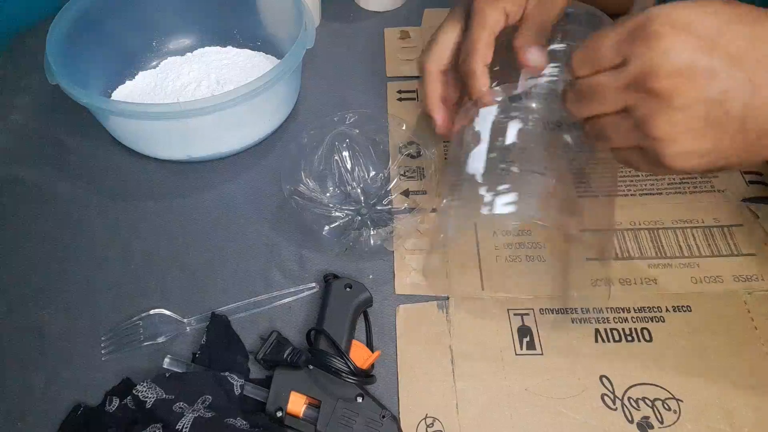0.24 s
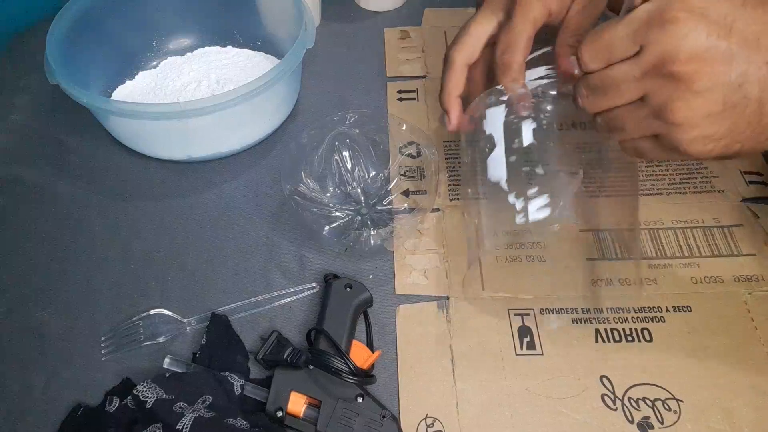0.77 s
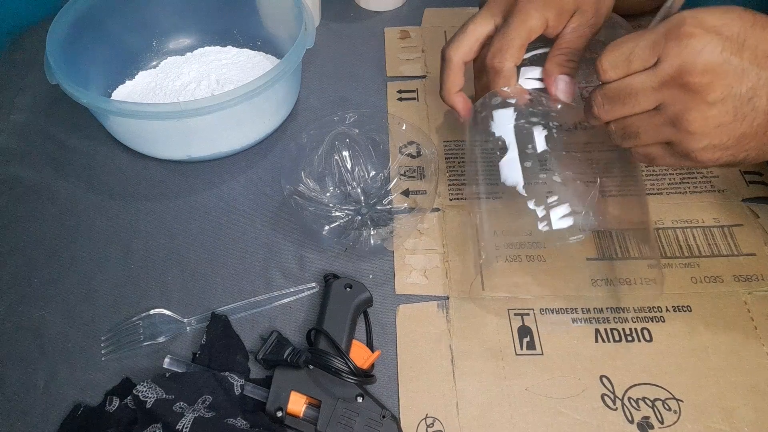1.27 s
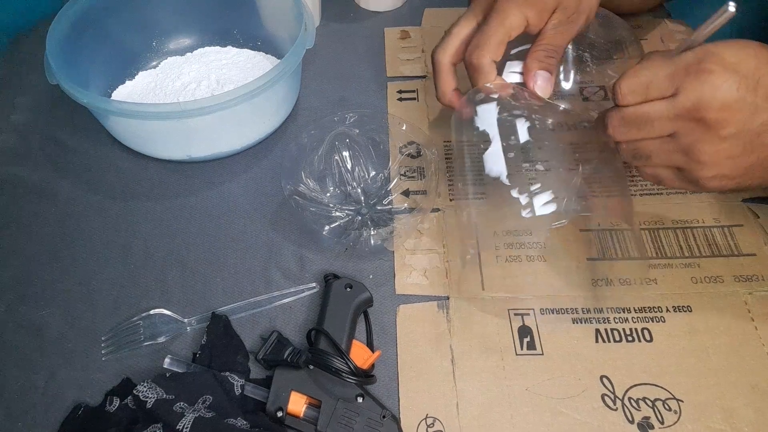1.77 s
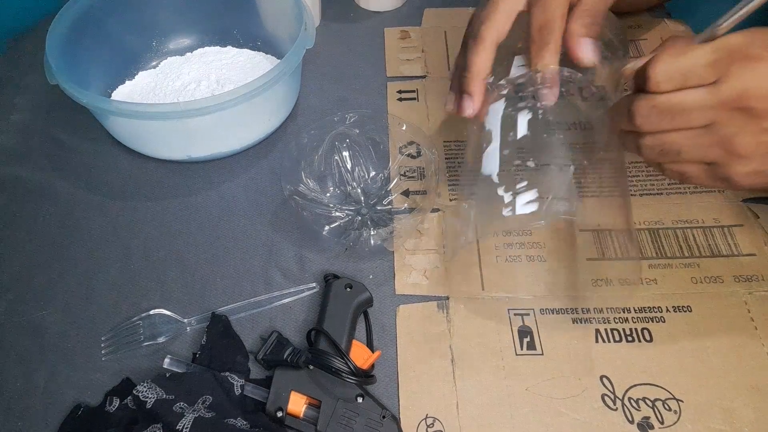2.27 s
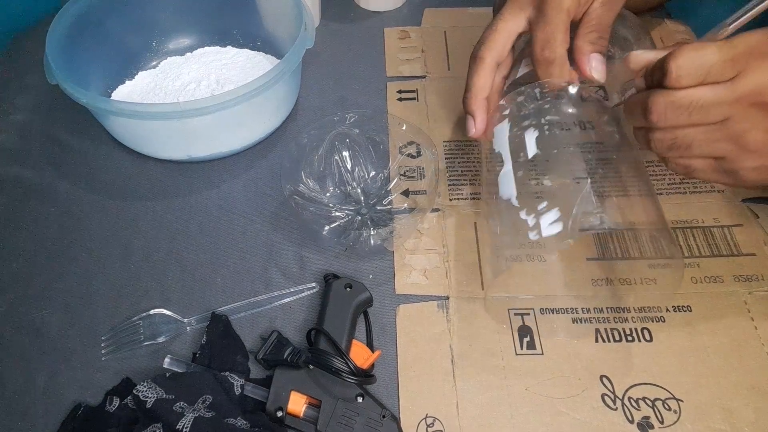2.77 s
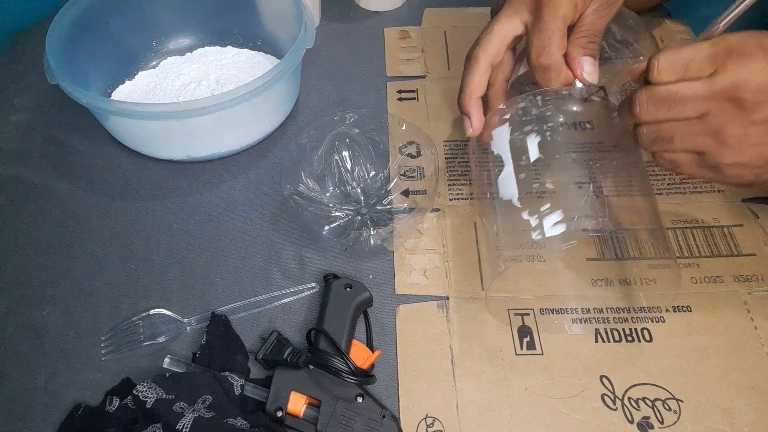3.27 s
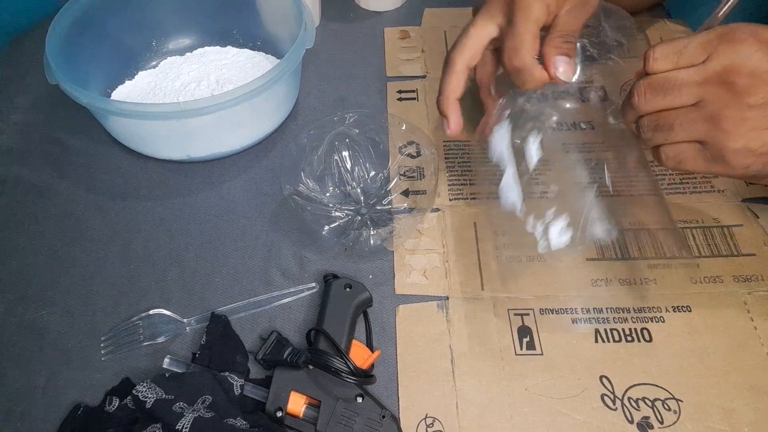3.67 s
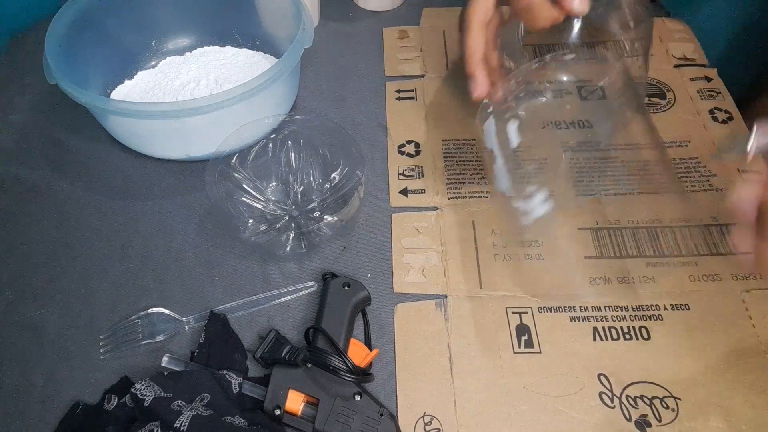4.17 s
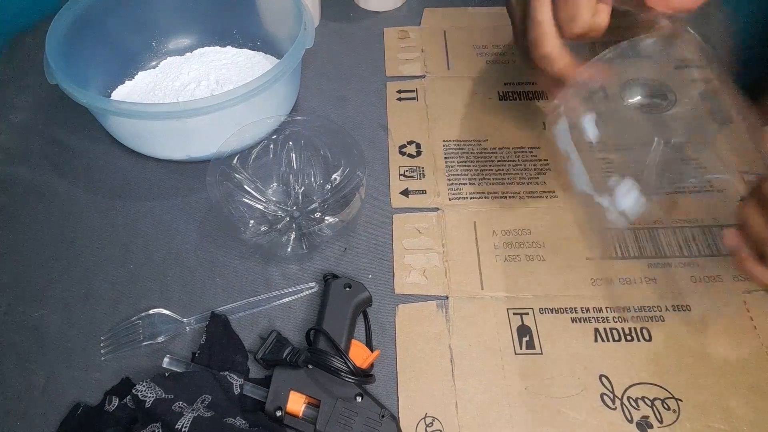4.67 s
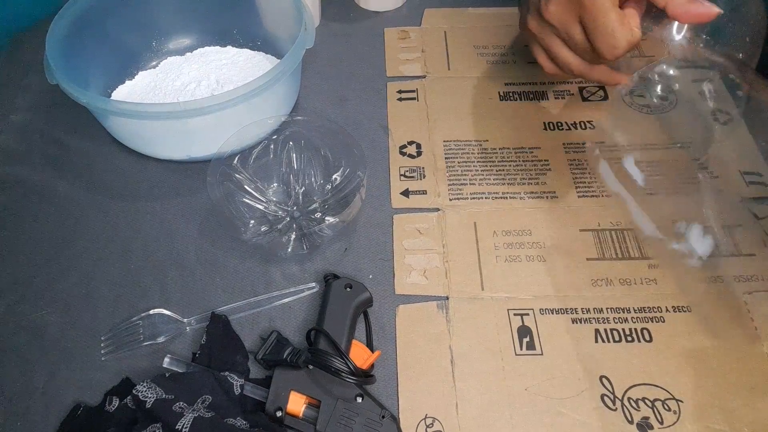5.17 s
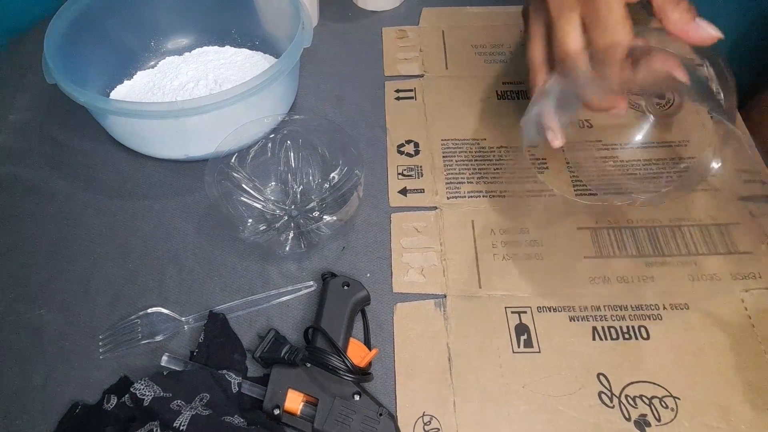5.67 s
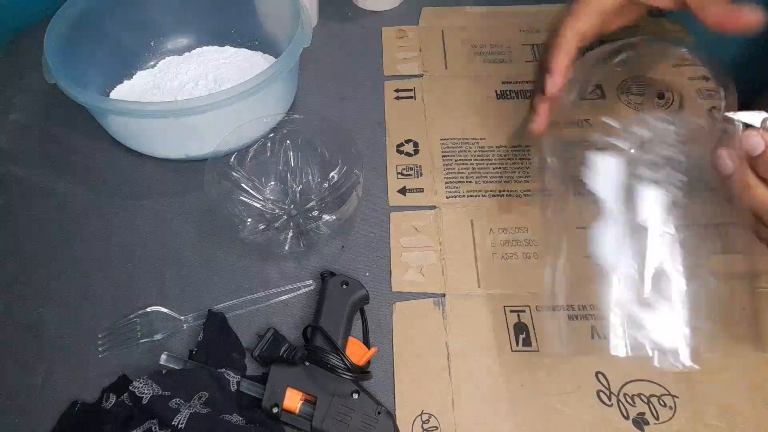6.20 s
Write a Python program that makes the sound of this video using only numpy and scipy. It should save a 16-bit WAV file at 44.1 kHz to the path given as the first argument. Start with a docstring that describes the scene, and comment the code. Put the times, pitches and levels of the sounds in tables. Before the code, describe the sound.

A thin plastic bottle is squeezed and trimmed close to the microphone in a small room with faint steady air noise. Light crinkles and scrapes open, followed by a cluster of sharp, hollow pops and thuds from 0.4 to 0.7 seconds. A loud crack and clack comes at 0.9, a strong hollow pop at 1.6 and smaller snaps around 2. Quieter blade and finger scrapes follow with small clicks. From about 3.3 seconds the blade saws quickly to and fro, each stroke firmer, ending in a loud burst of cracks at 3.8. Crackling, rubbing and soft bumps continue as the bottle turns on cardboard with a faint low table rumble, with sharper snaps near 4.7. Another loud group of cracks and hollow thuds falls between 5.4 and 5.7 seconds. Lighter scrapes and clicks run until about 6.4. Each snap has a short room echo.

```python
"""Trimming a plastic bottle

Close to the microphone in a small room, hands squeeze and turn a thin bottle on cardboard as a blade
trims it. Blade and fingers scrape in short strokes, and the table rumbles. The wall buckles in snaps,
each a short crack and a hollow ring of the dented panel. The bottle thuds and clacks as it buckles
or bumps the cardboard, and the room answers."""
import sys
import numpy as np
from scipy import signal
from scipy.fft import rfft, irfft, next_fast_len
from scipy.io import wavfile

SR = 44100
rng = np.random.default_rng(int(sys.argv[2]) if len(sys.argv) > 2 else 0)


def dump_mix(stems):
    """Bounce the given channels to the path in sys.argv[1] as a 16-bit WAV at rate SR."""
    frames = np.atleast_2d(stems).T  # one column per channel
    limited = np.clip(frames, -1, 1)  # hard clip at full scale
    pcm = np.round(limited * 32767).astype(np.int16)
    wavfile.write(sys.argv[1], SR, pcm)


N = 284004


def amp(db):
    return 10 ** (np.asarray(db) / 20)


def unit_rms(x):
    return x / np.sqrt(np.mean(x ** 2) + 1e-20)


def filtered(x, response):
    """x times a response of frequency."""
    size = next_fast_len(N + SR // 4)
    return irfft(rfft(x, size) * response(np.fft.rfftfreq(size, 1 / SR)), size)[..., :N]


def coloured(x, spectrum):
    """x given a (Hz, dB) spectrum, at rms 1."""
    knots_hz, db = np.transpose(spectrum)
    return unit_rms(filtered(x, lambda hz: amp(np.interp(np.log(hz + 1), np.log(knots_hz), db))))


def minimum_phase(db):
    """A response with these gains that lets nothing sound before the blow."""
    cepstrum = irfft(np.log(np.maximum(amp(db), 1e-6)))
    half = len(cepstrum) // 2
    return np.exp(rfft(np.r_[cepstrum[0], 2 * cepstrum[1:half], np.zeros(half)]))


def stereo_noise(size, width):
    """A shared part and an opposed part."""
    mid, side = rng.standard_normal((2, size))
    return np.array([mid + width * side, mid - width * side])


def add(out, start_s, x):
    """Mix x into out."""
    i = max(round(start_s * SR), 0)
    out[:, i:i + x.shape[1]] += x[:, :max(out.shape[1] - i, 0)]


# the air of the room: (frequency [Hz], level [dB])
AIR_SPECTRUM = [(25, -30), (40, -18.5), (62, -7), (80, -23.5), (200, -12), (300, -1.5), (550, -6.5),
                (900, -7.5), (2300, -13.5), (4000, -23), (7200, -28.5), (8200, -37.5), (16000, -31.5)]
def room_tone(air_db, hum_db, hum_hz):
    """Quiet steady air and a low hum around the microphone."""
    hum = amp(hum_db) * np.sin(2 * np.pi * hum_hz * np.arange(N) / SR)
    return amp(air_db) * coloured(stereo_noise(N, width=0.81), AIR_SPECTRUM) + hum


# the bottle slides and turns on the cardboard: (time [s], level [dB])
SLIDING = [(0, -58), (.3, -68.5), (3.6, -74.5), (4.0, -56), (4.35, -73), (4.8, -52), (5.05, -68),
           (5.68, -52), (5.87, -59), (5.98, -52.5), (6.44, -55.5)]
# the table's rumble: (frequency [Hz], level [dB])
RUMBLE_SPECTRUM = [(25, -31), (45, -12.5), (62, -1.5), (76, -1), (96, -2), (125, -1), (165, -4.5),
                   (200, -13.5), (400, -44.5)]
def table_rumble(stroke_push, level_db, rub_db=-25.5, thump_db=-48, thump_fade_s=0.072):
    """The sliding bottle rumbles through the cardboard; strokes and clear buckles each add a push."""
    t = np.arange(N) / SR
    push = amp(np.interp(t, *np.transpose(SLIDING))) + amp(rub_db) * stroke_push
    for start, _, ring_db, *_ in BUCKLES:
        push += amp(ring_db + thump_db) * (t > start) * np.exp(-np.abs(t - start) / thump_fade_s)
    rumble = coloured(stereo_noise(N, width=0.34), RUMBLE_SPECTRUM)
    return amp(level_db) * push * rumble * amp([[-.8], [.8]])


# strokes, edge high for the blade and low for a fingertip: (peak [s], length [s], level [dB], edge [dB])
STROKES = [(0.013, 0.11, -46, -3), (0.113, 0.057, -43.5, -2), (.2, 0.27, -52.5, -1), (.35, .085, -40, 5),
           (0.459, 0.14, -34, -11.5), (0.658, 0.073, -35.5, -2.5), (0.786, .09, -45, -2),
           (1.16, 0.098, -54, 3), (1.283, .11, -54, 5), (1.405, .07, -54, 4), (1.544, 0.13, -44.5, 10.5),
           (1.626, 0.055, -41.5, 3.5), (1.79, 0.15, -53, -12), (2.02, .08, -48, -14),
           (2.125, 0.21, -46.5, 7), (2.214, .1, -39, -2), (2.28, 0.16, -45.5, -4), (2.384, .08, -45, -4.5),
           (2.46, 0.07, -49, -4.5), (2.6, 0.075, -53, -6.5), (2.675, 0.078, -46.5, -0.5),
           (2.829, 0.2, -54, -8), (3.071, .09, -39.5, 2.5), (3.162, 0.047, -41, 10),
           (3.195, .1, -42.5, 3.5), (3.77, 0.11, -40, 3), (3.84, .1, -32, 0), (3.962, 0.19, -34, -0.5),
           (4.15, 0.17, -46, -4.5), (4.393, .07, -52, -19.5), (4.579, 0.14, -44.5, 4),
           (4.731, 0.082, -37.5, -2.5), (4.852, 0.036, -35, -2.5), (5.16, 0.054, -47, 2),
           (5.38, 0.17, -41, 5.5), (5.458, 0.092, -37, -13.5), (5.645, 0.098, -42.5, -9),
           (5.784, 0.1, -44.5, -1.5), (5.968, 0.16, -41.5, 4), (6.096, 0.078, -37.5, 3.5),
           (6.205, 0.27, -53, 2.5), (6.365, 0.15, -41, 0)]
def stroke_force(rise_share=0.42, hollow_per_edge=0.55):
    """Drive of hollow, scrape and fizz: each stroke swells and fades; more edge trades hollow for fizz."""
    t, force = np.arange(N) / SR, np.zeros((3, N))
    for peak, length, db, edge in STROKES + sawing(count=6):
        swell = np.interp((t - peak) / length, [-rise_share, 0, 1 - rise_share], [0, 1, 0])
        force += amp([db - hollow_per_edge * edge, db, db + edge])[:, None] * swell
    return force


def slips(per_second, spread_db, fade_s=0.00088):
    """Grain of the tiny slips under a stroke: irregular, a few large among many small."""
    when, rarity = rng.random((int(per_second * N / SR), 2)).T
    sizes = amp(-spread_db * np.log(np.maximum(rarity, .01)))
    impulses = np.bincount((when * N).astype(int), sizes ** 2, N)
    energy = signal.lfilter([1], [1, -np.exp(-1 / (fade_s * SR))], impulses)
    return unit_rms(np.sqrt(energy))


# the rubbed bottle's hollow, stick-slip, finest slips, blade's thin ring: (frequency [Hz], level [dB])
HOLLOW_SPECTRUM = [(120, -27.5), (250, -9.5), (330, -1.5), (420, -1.5), (510, 4.5), (620, -1), (760, -10),
                   (1200, -42)]
SCRAPE_SPECTRUM = [(400, -30.5), (800, 6.5), (1400, 1), (2500, -2.5), (4200, -4), (5800, -8.5),
                   (7400, -14.5), (8200, -32.5), (16000, -65)]
FIZZ_SPECTRUM = [(4000, -42.5), (7500, -0.5), (11000, 0), (14000, 1), (16000, -11.5)]
BLADE_SPECTRUM = [(4300, -39), (5200, 0), (5700, -2), (6100, -4.5), (6900, -18)]
# how deep the blade bites: (time [s], depth [0-1])
BLADE_BITE = [(3.0, 0.05), (3.15, 0), (3.35, 0.9), (3.75, 1), (3.85, 0.31)]
def scraping(force, hollow_db, scrape_db, fizz_db, blade_db, room_db):
    """Close up, slips rasp on the film, stir the hollow of the bottle and make the blade ring."""
    hollow_force, scrape_force, fizz_force = force
    grain = slips(per_second=1500, spread_db=3)
    bite = np.interp(np.arange(N) / SR, *np.transpose(BLADE_BITE))

    def friction(spectrum, width):
        return coloured(grain * stereo_noise(N, width), spectrum)

    hollow = amp(hollow_db) * hollow_force * friction(HOLLOW_SPECTRUM, width=0.35)
    scrape = amp(scrape_db) * scrape_force * friction(SCRAPE_SPECTRUM, width=0.91)
    fizz = amp(fizz_db) * fizz_force * friction(FIZZ_SPECTRUM, width=1.0)
    blade = amp(blade_db) * scrape_force * bite * friction(BLADE_SPECTRUM, width=0.45)
    direct = hollow + (film(scrape + fizz) + blade) * amp([[-1.2], [1]])
    return direct + amp(room_db) * room_tail(direct, t60=0.19, width=0.44)[:, :N]


# resonances of the stiff film: (frequency [Hz], width [Hz], gain [dB])
FILM_RESONANCES = [(1680, 69, 2), (1880, 120, 4), (2400, 110, -2.5), (2624, 410, 3.5), (2860, 200, 0),
                   (3500, 380, -0.5), (5600, 1700, 2)]
def film(x):
    """The bottle's thin wall colours its cracks and scrapes."""
    for hz, width_hz, db in FILM_RESONANCES:
        x = x + (amp(db) - 1) * signal.lfilter(*signal.iirpeak(hz, hz / width_hz, SR), x)
    return x


def room_tail(x, t60, width):
    """The small room's diffuse answer to x, different at each call."""
    t = np.arange(int(.4 * SR)) / SR
    onset = 1 - np.exp(-(t / 0.00048) ** 2)
    response = stereo_noise(len(t), width) * amp(-60 * t / t60) * onset
    response /= np.linalg.norm(response, axis=1, keepdims=True)
    return signal.fftconvolve(x, response, axes=1)


def crinkles(pitch_hz=508, spread_octaves=0.15, scatter=0.1, sharpness_db=-11.5):
    """Each of the STROKES sets off one small buckle near its peak; rows as in BUCKLES."""
    rows = []
    for peak, length, db, _ in STROKES:
        when, detune, swing, jump = rng.standard_normal(4)
        start = peak + scatter * length * when
        hz = pitch_hz * 2 ** (spread_octaves * detune)
        rows.append((start, hz, db - 2.5 - swing, db - 3.5 - jump, sharpness_db))
    return rows


def ring(t, modes, rise_s):
    """Plastic swings to a new shape and is quickly damped by the hand; a thin wall radiates little bass."""
    swing = sum(amp(db + rng.normal(0, 1) - 60 * t / t60) * np.sin(2 * np.pi * hz * t)
                for hz, db, t60 in modes)
    radiation = signal.butter(3, [256, 6000], "band", fs=SR, output="sos")
    sound = signal.sosfilt(radiation, swing * (1 - np.exp(-t / rise_s)))
    return sound / np.abs(sound).max()


# a crack with equal clack, crack and tick: (frequency [Hz], level [dB])
CRACK_SPECTRUM = [(200, -41.5), (480, -5.5), (720, 7.5), (1080, -0.5), (1750, -1), (3000, -0.5), (4500, 1),
                  (5800, 3), (7400, 1), (8300, -6.5), (12000, -3), (15500, -9.5)]
def crack(t, levels_db, fade_s, bands_hz):
    """A crease jumps through the film: a sharp burst shaped in three bands, clack, crack and tick."""
    hz = np.fft.rfftfreq(len(t), 1 / SR) + 1
    knots_hz, db = np.transpose(CRACK_SPECTRUM)
    colour = np.interp(np.log(hz), np.log(knots_hz), db)
    colour += np.interp(np.log(hz), np.log(bands_hz), levels_db)
    burst = rng.standard_normal((2, len(t))) * np.exp(-t / fade_s)
    burst /= np.linalg.norm(burst, axis=1, keepdims=True)
    mid, side = rfft(burst) * minimum_phase(colour)
    side *= np.interp(hz, [600, 4000], [.42, .72])  # short waves differ more from left to right
    return irfft([mid + side, mid - side], len(t)) * (t < t[-1] / 2)


# clear buckles of the wall: (time [s], pitch [Hz], ring [dB], crack [dB], tick over crack [dB])
BUCKLES = [(.0723, 494, -41, -40.5, -8.5), (0.0984, 530, -41, -34, -30), (0.1719, 525, -40, -36.5, -14),
           (.332, 360, -57, -48, -3), (.352, 530, -27, -40, -8.5), (0.4204, 395.5, -13.5, -31.5, -18),
           (0.5061, 394, -17.5, -32.5, -11.5), (.519, 460, -19.5, -29, -5.5), (.526, 471, -14, -32.5, -2),
           (.533, 495, -9.5, -30, -23.5), (0.6281, 490, -16.5, -31.5, -18), (.656, 451, -26, -45.5, -19),
           (0.8739, 521, -11, -10.5, -41), (1.572, 495, -3.5, -32.5, -31.5),
           (1.6153, 530, -35, -35.5, -17.5), (1.7536, 490, -35, -50, -13.5), (1.7919, 487, -23, -40.5, -7),
           (2.0196, 437, -29, -49.5, -6), (2.0645, 432, -15.5, -56, -1), (2.19, 489, -28.5, -42, -10),
           (2.217, 516, -30.5, -38.5, -31.5), (2.513, 540, -40.5, -41, -19.5), (3.0659, 432, -38, -56, 1.5),
           (3.6733, 505, -29, -40.5, -23.5), (3.781, 524, -15.5, -30, -8.5), (3.7888, 534, -28, -20, -5.5),
           (3.7909, 491, -3, -21, -7), (3.819, 516, -32, -37, -18.5), (3.8762, 485, -38.5, -32.5, -11),
           (3.9237, 470, -45.5, -36.5, -5), (3.952, 448, -42.5, -42, -12), (3.97, 699, -29, -34.5, -8),
           (3.9961, 492, -25, -34, -7.5), (4.0241, 424, -26.5, -50, -13.5),
           (4.1164, 373, -37.5, -37.5, -16.5), (4.165, 614, -36.5, -47, -2.5),
           (4.197, 394, -27.5, -45.5, -30.5), (4.546, 407, -31.5, -42, -13),
           (4.6828, 434, -32.5, -25.5, -15), (4.766, 420, -29, -21.5, -11), (4.852, 520, -34.5, -39, -18),
           (5.1536, 420, -55, -36.5, -9.5), (5.3753, 321, -29.5, -27, -15.5),
           (5.433, 563, -24.5, -37.5, -9), (5.4406, 540, -27, -21, -20), (5.449, 560, -35, -31, -7.5),
           (5.467, 531, -14.5, -36, -11.5), (5.5446, 282, -54, -41, -12.5),
           (5.6773, 511, -17.5, -27, -32.5), (5.69, 527, -15, -34.5, -14), (5.9435, 658, -31, -35, -13.5),
           (6.0712, 645, -36.5, -41, -6), (6.1818, 460, -46, -38, -23.5)]
# modes of a dented panel: (multiple of its pitch [ratio], level [dB], t60 [s])
PANEL_MODES = [(.72, -27.5, 0.013), (1, 7, 0.053), (1.201, -16, 0.04), (1.451, -25.5, 0.0078)]
def snaps(ring_db, crack_db, ring_room_db, crack_room_db):
    """Every buckle cracks and rings near the microphone; each excites the room in its own way."""
    rings, ring_tails, cracks = np.zeros((3, 2, N))
    t = np.arange(4096) / SR
    for start, pitch_hz, ring_level, crack_level, sharpness in BUCKLES + crinkles():
        modes = [(ratio * pitch_hz, db, t60) for ratio, db, t60 in PANEL_MODES]
        swing = amp(ring_level + ring_db) * ring(t, modes, rise_s=0.0015)
        panel = at_microphone(np.array([swing, swing]), start)
        clack_level = -5 + 0.44 * (ring_level + crack_level)  # grows with both swing and jump
        levels = [clack_level, crack_level, crack_level + sharpness]
        burst = crack(t, levels, fade_s=.0036, bands_hz=[1400, 3700, 10100])
        crease = at_microphone(amp(crack_db) * burst * amp([[-1.5], [1.2]]), start)
        add(rings, start, panel)
        add(cracks, start, crease)
        add(ring_tails, start, amp(ring_room_db) * room_tail(panel, t60=0.27, width=0.3))
        add(cracks, start, amp(crack_room_db) * room_tail(crease, t60=0.24, width=0.2))
    return with_echoes(rings) + ring_tails + film(cracks)


# the bottle's place before the microphone: (time [s], lead of the right channel [samples])
RIGHT_LEAD = [(0, 2), (4.2, 2), (4.7, 5.33), (6.44, 5)]
def at_microphone(x, time_s):
    """The sound reaches the right side a little earlier."""
    lead = round(np.interp(time_s, *np.transpose(RIGHT_LEAD)))
    left = np.pad(x[0], (lead, 0))[:x.shape[1]]
    return np.array([left, x[1]])


# reflections off the near walls: (delay [s], level [dB])
WALL_ECHOES = [(.00972, -8.5), (.031, -13), (0.0486, -22.5)]
def with_echoes(x):
    """The direct sound, then its copies off the walls."""
    return x + sum(amp(db) * np.pad(x, ((0, 0), (round(s * SR), 0)))[:, :N] for s, db in WALL_ECHOES)


# hollow thuds and dull clacks of the bottle: (time [s], thud [dB], clack [dB])
THUDS_AND_CLACKS = [(.0993, -40, -27.5), (0.4213, -17.5, -14.5), (0.514, -14.5, -29), (.627, -19.5, -24),
                    (.8738, -24.5, -8), (1.5729, -15, -16.5), (2.065, -17.5, -24.5), (2.513, -37, -35.5),
                    (4.0239, -25.5, -25), (4.1975, -27, -33), (4.368, -36.5, -49.5), (4.547, -25.5, -54),
                    (4.684, -30, -44), (4.766, -26, -48), (4.85, -38, -31.5), (5.441, -10.5, -34),
                    (5.448, -15, -38), (5.47, -48, -41), (5.63, -28, -36), (5.678, -13.5, -30),
                    (6.1838, -45, -25), (6.36, -29, -54)]
# modes of the whole bottle: (frequency [Hz], level [dB], t60 [s])
BOTTLE_MODES = [(242, -3.5, 0.022), (276, -1, 0.048), (325.6, -6, 0.12), (484, -10, 0.073),
                (610, 5.5, 0.027), (639, -16, 0.021), (780, -14.5, 0.013), (883, 2, 0.027)]
# colour of a dull clack: (clack band [dB], crack band [dB], tick band [dB])
CLACK_COLOUR = [-1, -29.5, -48.5]
def thuds_and_clacks(thud_db, clack_db, room_db):
    """The bottle gives a hollow thud and a dull clack as its wall buckles or bumps the cardboard."""
    direct, tails = np.zeros((2, 2, N))
    t = np.arange(4096) / SR
    for start, thud_level, clack_level in THUDS_AND_CLACKS:
        burst = crack(t, CLACK_COLOUR, fade_s=.0025, bands_hz=[1637, 3600, 9200])
        clack = amp(clack_level + clack_db) * burst
        thud = amp(thud_level + thud_db) * ring(t, BOTTLE_MODES, rise_s=0.0012)
        sound = at_microphone((thud + clack) * amp([[-.8], [.8]]), start)
        add(direct, start, sound)
        add(tails, start, room_tail(sound, t60=0.29, width=0.43))
    return with_echoes(direct) + amp(room_db) * tails


def sawing(count, start_s=3.278, period_s=.082, length_s=0.066, first_db=-51.5, step_db=1.83, edge_db=2):
    """The blade saws evenly to and fro, each stroke firmer than the last; rows as in STROKES."""
    return [(start_s + k * period_s, length_s, first_db + k * step_db, edge_db) for k in range(count)]


def scene():
    """Snaps, thuds, clacks and scraping up close, over the table's rumble and the room tone."""
    force = stroke_force()
    return (snaps(ring_db=-1.5, crack_db=29.5, ring_room_db=-6.5, crack_room_db=-3.5)
            + thuds_and_clacks(thud_db=-2.5, clack_db=24.5, room_db=-3.0)
            + scraping(force, hollow_db=-2.0, scrape_db=-4.0, fizz_db=-20.0, blade_db=-8.0, room_db=-5.5)
            + table_rumble(force[0], level_db=0.5)
            + room_tone(air_db=-58.5, hum_db=-78, hum_hz=62.0))


def record(dry, top_hz=16000):
    """At the microphone the loudest snaps round off at full scale; nothing passes the band limit."""
    clipped = dry / (1 + np.abs(dry) ** 6) ** (1 / 6)
    return filtered(clipped, lambda hz: hz < top_hz)


dry = scene()
out = record(dry)
dump_mix(out)
```